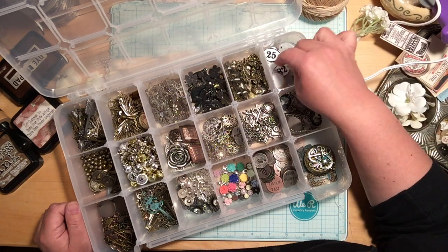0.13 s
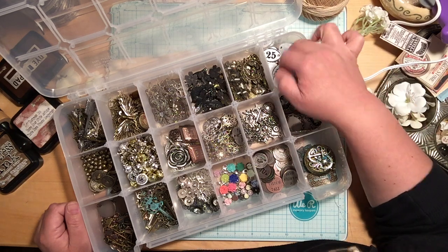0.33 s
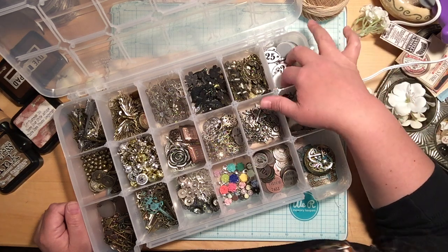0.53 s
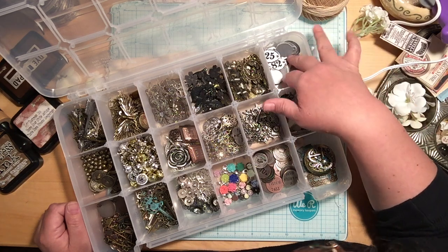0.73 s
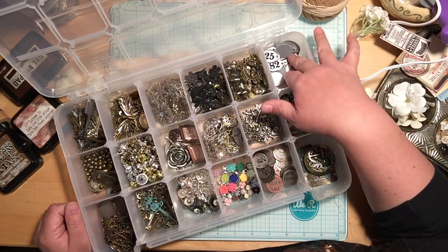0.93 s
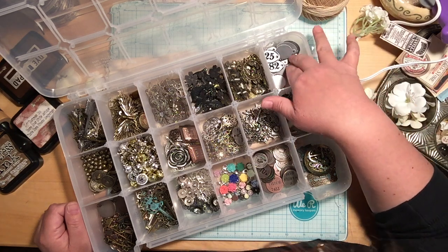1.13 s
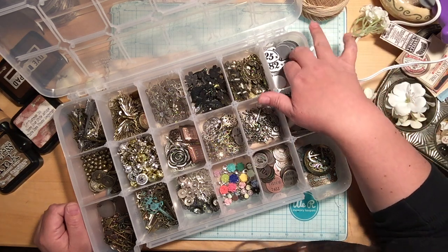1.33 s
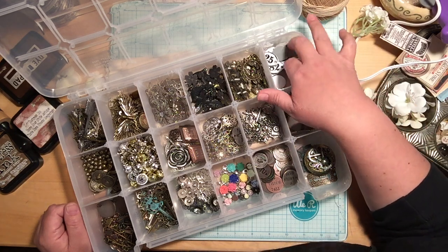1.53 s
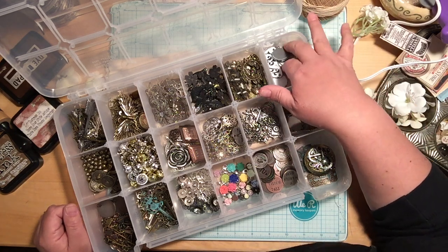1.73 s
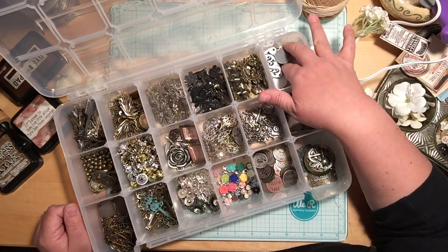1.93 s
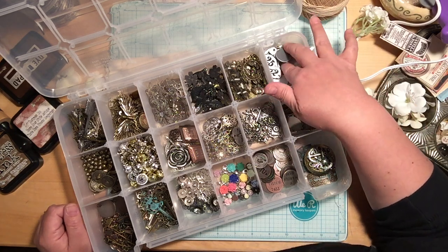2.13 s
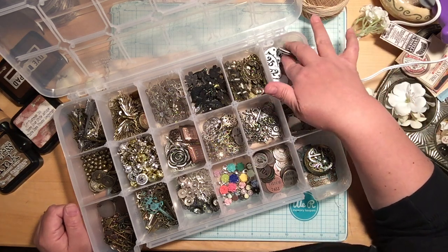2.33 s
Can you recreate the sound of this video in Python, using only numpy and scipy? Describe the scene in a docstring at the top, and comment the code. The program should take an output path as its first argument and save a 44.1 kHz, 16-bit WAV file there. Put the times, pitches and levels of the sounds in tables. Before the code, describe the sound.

Small metal charms clink and rattle as fingers sift them in a plastic box.

```python
"""Small metal charms and tags, sifted by fingers in one compartment of a plastic organizer box, close to
the microphone in a quiet room. A few drop in and settle, then they are nudged about: every contact
knocks the plastic, clacks on the heap and sets thin metal ringing. Between contacts the pieces slide,
rattle and scrape, and a fingertip rubs the plastic. Room air and a faint hum lie underneath."""
import sys
import numpy as np
from scipy import signal
from scipy.fft import rfft, irfft
from scipy.io import wavfile
from scipy.ndimage import map_coordinates

SR = 44100
rng = np.random.default_rng(int(sys.argv[2]) if len(sys.argv) > 2 else 0)


def to_wav(s):
    """Save 16-bit WAV."""
    ch = np.atleast_2d(s).T  # columns
    pcm = np.round(np.clip(ch, -1, 1) * 32767)  # PCM
    wavfile.write(sys.argv[1], SR, pcm.astype(np.int16))


N = 105531


def contacts(bodies):
    """Charms hit each other and the walls of the compartment, chattering as they land."""
    # single contacts: (time [s], plastic knock [dB], clack [dB], metal [dB])
    hits = [(0.09, -33.5, -44.5, -79), (0.12, -34, -59, -66), (0.1354, -18.5, -12.5, -34),
            (.1385, -13.5, -15, -23.5), (0.158, -45, -20, -25), (0.1625, -29, -14, -13),
            (.169, -18, -17, -10), (.1738, -24, -23, -26), (0.1882, -34, -24, -12.5),
            (0.1968, -39, -23.5, -33), (.2038, -30, -18, -27), (0.2103, -28, -25, -36.5),
            (.2257, -31.5, -24, -25), (.2405, -27.5, -25, -25), (.258, -26.5, -40, -21),
            (.267, -42, -45, -50), (0.3426, -39.5, -38.5, -36.5), (0.4978, -25.5, -20, -23),
            (0.5044, -25.5, -16.5, -35), (0.5269, -30.5, -26.5, -22), (0.5299, -27, -25.5, -32),
            (.536, -32, -34, -44), (0.5858, -33.5, -32, -31), (.594, -34, -36, -29),
            (0.6021, -48, -27.5, -23.5), (0.6362, -34.5, -31, -32.5), (0.6855, -38.5, -31, -31.5),
            (.718, -41.5, -39, -58), (0.8192, -43, -40.5, -64), (.843, -46.5, -45, -48),
            (0.9738, -62, -49.5, -77.5), (1.0841, -29.5, -32, -48.5), (1.1045, -31.5, -36, -53),
            (1.1154, -36, -41.5, -55), (1.1314, -46, -42, -60), (1.2806, -33, -31, -36.5),
            (1.3205, -60.5, -44, -37.5), (1.365, -53.5, -47.5, -65), (1.3757, -48, -49, -65),
            (1.4225, -34, -32, -43), (1.4397, -32.5, -34.5, -41), (1.4613, -28.5, -31, -49),
            (1.5066, -35.5, -33, -48), (1.582, -33.5, -25.5, -30), (1.628, -62, -33.5, -62),
            (1.6348, -47, -34.5, -37), (1.668, -64, -37, -60), (1.683, -43, -34.5, -60),
            (1.7182, -38, -30.5, -35), (1.74, -32.5, -33.5, -23.5), (1.7505, -46, -32, -33.5),
            (1.7703, -43, -34, -44), (1.785, -37, -33, -53), (1.819, -36, -37, -36),
            (1.8605, -33.5, -33, -52), (1.877, -54, -35.5, -30), (1.9623, -48, -61, -41),
            (1.979, -36, -40.5, -45), (2.0029, -31, -40.5, -55), (2.018, -45, -44, -52.5),
            (2.03, -40.5, -42, -50.5), (2.14, -64.5, -59.5, -75), (2.217, -47.5, -48, -60.5),
            (2.348, -40, -46.5, -61.5), (2.359, -45, -36.5, -43.5)]
    out = np.zeros(N)
    for (time, *levels), *parts in zip(hits, *touches(bodies, count=len(hits))):
        add(out, time, from_db(levels) @ chatter(np.array(parts)))
    return out


def chatter(parts, mean_hop_s=.0013, hop_loss_db=9):
    """A piece strikes three times in tiny hops, each weaker; the total energy stays the same."""
    gaps = .5 + rng.random(3)
    lags = (mean_hop_s * SR * (np.cumsum(gaps) - gaps[0])).astype(int)
    out = np.zeros_like(parts)
    for hop, lag in enumerate(lags):
        out[:, lag:] += from_db(-hop_loss_db * hop) * parts[:, :parts.shape[1] - lag]
    return out * parts.std(axis=1, keepdims=True) / out.std(axis=1, keepdims=True)


def body_modes():
    """The four sets of modes that a touch excites: plastic box, clack, tick and ringing charms."""
    # modes of the plastic box: (frequency [Hz], level [dB], t60 [s])
    box_modes = [(440, -13, 0.033), (649, -3, 0.029), (826, -9, 0.018), (950.4, -4, 0.041),
                 (1042.6, -3, 0.04), (1140, -1, 0.02), (1233, -4, 0.022), (1350, -1, 0.033),
                 (1498, -3, 0.044), (1630, -2, 0.034), (1935, -1.5, 0.0087), (2038, -2.5, 0.03),
                 (2600, -4.5, 0.042)]
    # spectrum of the clack on the heap: (frequency [Hz], level [dB])
    clack_colour = [(1750, -1.5), (2300, 1), (2600, 4), (3100, 1.5), (3700, 1.5), (4900, -3), (6200, -0.5),
                    (7400, -10.5), (9000, -11), (11000, -24)]
    # spectrum of the bright tick of metal on metal: (frequency [Hz], level [dB])
    tick_colour = [(7000, -16), (10500, -6.5), (12000, -3), (13300, 5.5), (14400, -4), (15800, -8.5)]
    # modes of a charm of middling size: (frequency [Hz], level [dB], t60 [s])
    charm_modes = [(11900, -1.5, 0.078), (12700, -4.5, 0.083), (12500, -3.5, 0.082), (13240, -2.5, .06),
                   (13650, -5, .07), (14965, -8.5, .08), (15500, -1, .06)]
    clack_modes = dense_modes(clack_colour, mean_t60_s=.025, count=320)
    tick_modes = dense_modes(tick_colour, mean_t60_s=.016, count=160)
    return box_modes, clack_modes, tick_modes, charm_modes


def dense_modes(colour, mean_t60_s, count):
    """Many short modes scattered under a spectrum: (frequency [Hz], level [dB], t60 [s])."""
    low_hz, high_hz = colour[0][0], colour[-1][0]
    hz = low_hz + (high_hz - low_hz) * (np.arange(count) + rng.random(count)) / count
    return np.column_stack([hz, at_hz(colour, hz), mean_t60_s * (.5 + rng.random(count))])


def touches(bodies, count):
    """Each touch sounds in three parts: plastic knock, clack, and metal tick with its ring."""
    box_modes, *heap_modes = bodies
    knock = blows(box_modes, count, spread_db=3.5)
    clack, tick, ring = (blows(modes, count, spread_db=1.5) for modes in heap_modes)
    clack = detuned(clack)
    metal = from_db(-7) * tick + from_db(-13) * detuned(ring)
    return from_db(-3.5) * knock, from_db(-3) * clack, metal


def blows(modes, count, spread_db, rise_s=.00026):
    """A body rings under separate blows, each driving its modes with different strengths and signs."""
    hz, db, t60 = np.transpose(modes)[:, :, None]
    t = np.arange(int(np.clip(t60.max(), .02, .4) * SR)) / SR
    rings = from_db(db - 60 * t / t60) * (1 - np.exp(-t / rise_s)) * np.sin(2 * np.pi * hz * t)
    chance = rng.standard_normal((count, 2, len(modes)))
    strengths = np.sign(chance[:, 0]) * from_db(spread_db * chance[:, 1])
    out = strengths @ rings
    out /= out[:, t < .003].std(axis=1, keepdims=True)  # equal level over the first 3 ms
    return np.pad(out, [(0, 0), (0, SR // 2 - len(t))])


def detuned(sounds, pitch_spread=.022):
    """Each touch takes the pitch of a slightly larger or smaller charm."""
    samples = np.arange(sounds.shape[1])
    speeds = np.exp(pitch_spread * rng.uniform(-1.1, 1, len(sounds)))
    return np.array([map_coordinates(sound, [samples * speed], order=3)
                     for sound, speed in zip(sounds, speeds)])


def landings(t60_s=.028, rise_s=.0011):
    """A piece lands flat and rings two modes of the compartment: a short pitched clack."""
    # flat landings: (time [s], lower mode [dB], lower mode [Hz], upper mode [dB], upper mode [Hz])
    flat_landings = [(.135, -4, 1094, -9.5, 2593), (0.1397, 0, 929, -13, 2940),
                     (.1622, -11.5, 2690, -12, 3520), (0.168, -14, 1308, -21, 2660),
                     (0.1866, -16.5, 2610, -20, 2910), (0.1973, -23, 1090, -35, 4530),
                     (0.2253, -24, 2100, -17, 2660), (0.5043, -25, 2700, -13, 2960),
                     (0.528, -25.5, 1490, -19, 4300), (0.571, -29, 2090, -28, 2570),
                     (.5945, -24.5, 2060, -23, 2580), (0.602, -24, 2625, -24, 5550),
                     (1.0855, -34, 1320, -28, 2750), (1.2794, -34.5, 1515, -38, 2533),
                     (1.4612, -23, 1007, -23, 2500), (1.5819, -24.5, 1290, -24, 3010),
                     (1.706, -27, 1140, -37, 2930), (1.7185, -30, 1080, -28, 2974),
                     (1.819, -29.5, 925, -27.5, 2670), (1.978, -28, 980, -34, 1514),
                     (2.003, -29.5, 957, -25, 1593), (2.347, -27, 1106, -47, 2610)]
    out = np.zeros(N)
    for time, low_db, low_hz, high_db, high_hz in flat_landings:
        add(out, time, note(low_db, low_hz, t60_s, rise_s) + note(high_db, high_hz, t60_s, rise_s))
    return out


def pings():
    """A charm hangs free and sings on one thin high mode until a neighbour damps it."""
    # freely ringing charms: (time [s], level [dB], pitch [Hz], t60 [s])
    free_rings = [(.164, -18.5, 12750, .06), (.164, -21.5, 12260, 0.12), (0.187, -11.5, 13200, 0.08),
                  (.188, -18, 13700, .12), (.19, -21, 15400, .16), (.2255, -21, 11958, 0.16),
                  (0.2275, -22, 13660, .15), (.498, -45, 12770, 0.089), (.5275, -18.5, 13800, 0.033),
                  (.5275, -20, 15590, .05), (0.594, -23, 14950, .05), (.603, -33, 12050, 0.12),
                  (.6365, -27, 15000, 0.045), (1.211, -61.5, 11940, 0.072), (1.4242, -42.5, 12600, 0.14),
                  (1.4242, -47, 14965, 0.098), (1.581, -23, 15100, 0.032), (1.74, -36, 13000, 0.025),
                  (1.819, -36, 12670, 0.094), (1.82, -46, 14900, .11)]
    out = np.zeros(N)
    for time, db, hz, t60_s in free_rings:
        add(out, time, note(db, hz, t60_s, rise_s=.00069))
    return out


def note(db, hz, t60_s, rise_s):
    """One mode swells and rings out."""
    t = np.arange(SR // 3) / SR
    return from_db(db - 60 * t / t60_s) * (1 - np.exp(-(t / rise_s) ** 2)) * np.sin(2 * np.pi * hz * t)


def slides(bodies, touches_per_s=400, spread_db=5.5):
    """Sliding pieces rattle in quick uneven runs of tiny touches."""
    # slides: (start [s], length [s], plastic knock [dB], clack [dB], metal [dB])
    runs = [(0.098, 0.035, -49, -55.5, -68), (0.163, 0.05, -33, -33, -35), (0.215, .055, -35, -33, -36),
            (0.271, 0.04, -50.5, -63, -55), (0.39, 0.027, -50, -65.5, -85),
            (0.503, 0.041, -37, -36.5, -41.5), (0.559, 0.059, -40, -40, -48),
            (0.681, 0.057, -51.5, -53.5, -57.5), (0.82, .03, -55.5, -55, -66),
            (0.919, 0.046, -58, -57, -75), (0.997, .04, -55.5, -72.5, -88.5), (1.427, 0.063, -46, -46, -55),
            (1.483, 0.21, -59, -55.5, -69), (1.678, 0.12, -44.5, -45.5, -58.5),
            (1.85, 0.038, -47, -49.5, -54), (2.332, 0.053, -53, -53.5, -61)]
    out = np.zeros(N)
    stock = touches(bodies, count=96)
    for (start, length, *levels), chance in zip(runs, rng.random((len(runs), 256, 3))):
        count = int(np.clip(length * touches_per_s, 3, len(chance)))
        jitter, softness, choice = chance[:count].T
        times = start + length * (np.arange(count) + jitter) / count
        gains = from_db(-spread_db * np.log(np.maximum(softness, .03)))  # many light touches, a few hard
        for db, sounds in zip(levels, stock):
            rattle = np.zeros(N)
            for time, gain, pick in zip(times, gains, (choice * len(sounds)).astype(int)):
                add(rattle, time, gain * sounds[pick])
            rattle_rms = np.sqrt(np.sum(rattle ** 2) / (length * SR) + 1e-20)
            out += from_db(db) * rattle / rattle_rms
    return out


def scrapes():
    """An edge scrapes along another piece with a bright rasp."""
    # strokes of the edge: (start [s], length [s], level [dB])
    strokes = [(1.844, 0.09, -47), (1.944, 0.085, -50), (2.212, 0.059, -55), (2.269, 0.032, -59.5),
               (2.323, 0.079, -51.5)]
    # spectrum of scraped metal: (frequency [Hz], level [dB])
    colour = [(2500, -5.5), (5000, -0.5), (7000, 4), (9000, -1.5), (11000, -14), (15000, -10)]
    return friction(strokes, colour)


def rubs():
    """A fingertip rubs on the plastic and keeps it ringing softly."""
    # strokes of the fingertip: (start [s], length [s], level [dB])
    strokes = [(.28, 0.32, -56), (1.47, 0.33, -55)]
    # spectrum of rubbed plastic: (frequency [Hz], level [dB])
    colour = [(600, -15), (930, 4), (1800, -4), (2080, 7), (2400, -8.5), (6000, -31.5)]
    return friction(strokes, colour)


def friction(strokes, colour, grit_db=3.5, grit_hz=347):
    """Gritty friction noise swells and fades with each short stroke."""
    grit = from_db(grit_db * rms_one(low_pass(rng.standard_normal(N), grit_hz)))
    envelope = np.zeros(N)
    for start, length, db in strokes:
        add(envelope, start, from_db(db) * signal.windows.tukey(int(length * SR), .5))
    return envelope * rms_one(coloured(grit * rng.standard_normal(N), colour))


def room_tail(sound, t60_s=.25, delay_s=.0033, level_db=-11.5):
    """The room's reflections reach the close microphone as a faint dull tail."""
    # spectrum of the reflections: (frequency [Hz], level [dB])
    colour = [(450, -4), (640, 4), (800, -2.5), (1400, -5), (2100, -3.5), (4000, -3.5), (14000, -21)]
    t = np.arange(SR // 2) / SR
    tail = rng.standard_normal(len(t)) * from_db(-60 * t / t60_s) * (t > delay_s)
    tail = coloured(tail / np.sqrt(np.sum(tail ** 2)), colour)
    return from_db(level_db) * signal.fftconvolve(sound, tail)[:N]


def room_air(level_db=-59):
    """The steady, mostly low noise of a quiet room."""
    # spectrum of the air: (frequency [Hz], relative level [dB])
    colour = [(25, -25), (60, 0), (120, -5.5), (260, -5), (420, -27.5), (600, -26), (1000, -19),
              (2000, -25), (6500, -33.5), (10000, -41), (15000, -47.5)]
    return from_db(level_db) * rms_one(coloured(rng.standard_normal(N), colour))


def hum(waver_depth=.5, waver_hz=9.9):
    """Two faint low tones in the room waver in level and phase."""
    # tones of the hum: (frequency [Hz], level [dB])
    tones = [(74.5, -63), (221, -59)]
    out = np.zeros(N)
    for hz, db in tones:
        phase = 2 * np.pi * hz * np.arange(N) / SR
        swell, drift = (waver_depth * rms_one(low_pass(rng.standard_normal(N + SR), waver_hz)[SR:])
                        for _ in range(2))
        out += from_db(db) * ((1 + swell) * np.sin(phase) + drift * np.cos(phase))
    return out


def low_tone():
    """A faint low tone bends in pitch for the first tenth of a second."""
    # course of the tone: (time [s], pitch [Hz], level [dB])
    course = [(0, 248, -45), (0.029, 240, -78), (0.061, 300, -47.5), (.08, 265, -48), (0.109, 234, -62)]
    times, hz, db = np.transpose(course)
    t = np.arange(N) / SR
    phase = 2 * np.pi * np.cumsum(np.interp(t, times, hz)) / SR
    return np.interp(t, times, from_db(db), right=0) * np.sin(phase)


def from_db(db):
    """Decibels to gain."""
    return 10 ** (np.asarray(db) / 20)


def rms_one(x):
    """Scale to unit rms."""
    return x / np.sqrt(np.mean(x ** 2) + 1e-20)


def at_hz(colour, hz):
    """Read a spectrum's level in dB along a log-frequency axis."""
    points_hz, db = np.transpose(colour)
    return np.interp(np.log(hz + 1e-6), np.log(points_hz), db)


def coloured(x, colour):
    """Shape a sound by a spectrum."""
    hz = np.arange(len(x) // 2 + 1) * SR / len(x)
    return irfft(rfft(x) * from_db(at_hz(colour, hz)), len(x))


def low_pass(x, hz):
    """Gentle second-order low-pass."""
    return signal.sosfilt(signal.butter(2, hz, fs=SR, output="sos"), x)


def add(out, time, sound):
    """Mix a sound in at a time in seconds."""
    start = int(np.clip(time * SR, 0, N))
    out[start:start + len(sound)] += sound[:N - start]


def scene(box_low_cut_hz=230):
    """The box of charms close up in its room, in mono; the small box radiates little bass."""
    bodies = body_modes()
    box = contacts(bodies) + slides(bodies) + landings() + pings() + scrapes() + rubs()
    box = signal.sosfilt(signal.butter(2, box_low_cut_hz, "high", fs=SR, output="sos"), box)
    return (box + room_tail(box) + room_air() + hum() + low_tone())[None]


def record(dry, low_cut_hz=38, ceiling=.68, high_cut_hz=15850):
    """The microphone chain cuts deep rumble, rounds off the loudest knock and cuts the top steeply."""
    no_rumble = signal.sosfilt(signal.butter(3, low_cut_hz, "high", fs=SR, output="sos"), dry)
    rounded = no_rumble / (1 + (no_rumble / ceiling) ** 6) ** (1 / 6)
    return signal.sosfilt(signal.ellip(10, .2, 80, high_cut_hz, fs=SR, output="sos"), rounded)


dry = scene()
out = record(dry)
to_wav(out)
```